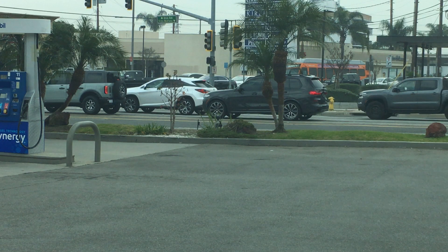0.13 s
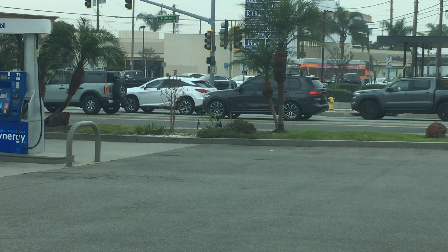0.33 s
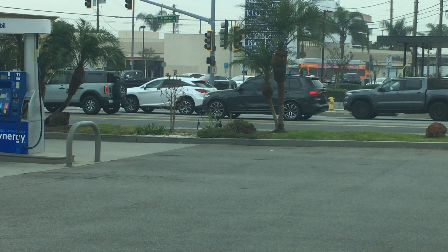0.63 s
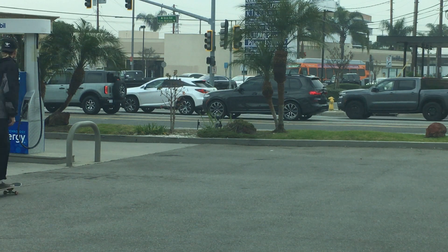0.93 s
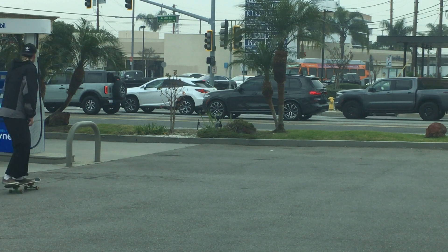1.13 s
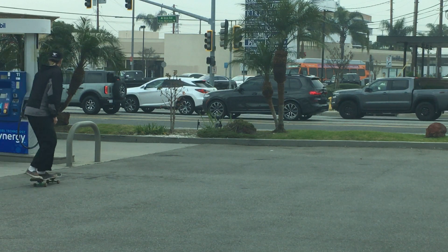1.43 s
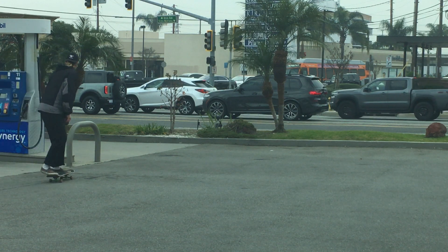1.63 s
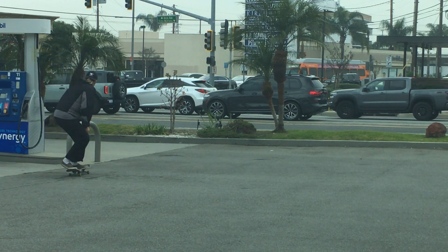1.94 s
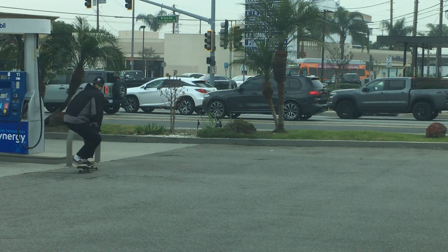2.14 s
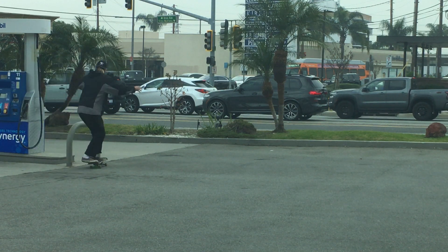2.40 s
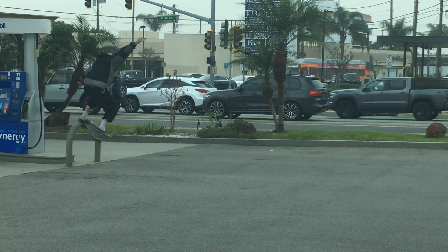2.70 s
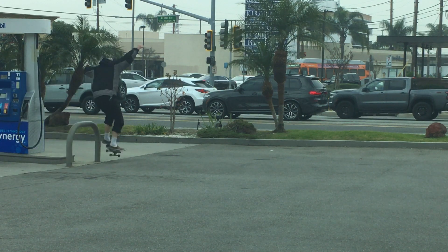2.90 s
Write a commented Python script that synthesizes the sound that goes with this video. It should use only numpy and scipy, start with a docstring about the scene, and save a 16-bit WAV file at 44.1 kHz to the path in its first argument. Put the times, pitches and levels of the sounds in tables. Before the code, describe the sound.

A skateboard clacks faintly twice over pavement joints, then late on pops sharply, knocks a steel bar and scrapes briefly. Deep traffic rumble, engine hum and faint rhythmic brake squeaks continue outdoors, heard from a distance.

```python
"""Deep traffic rumble, shaped noise in overlapping octave bands, fills a forecourt beside a busy road.
An idling engine hums as a sine of drifting pitch, tyres hiss as band-passed noise, and a wheel squeaks
twice a turn as a car pulls away, each rub sweeping through narrow resonances. A skateboard clacks over
joints, pops, knocks on a steel bar (noisy contacts ringing decaying modes) and scrapes as gritty noise;
walls nearby smear each hit into a short noisy tail."""
import sys
import numpy as np
from scipy import signal
from scipy.fft import rfft, irfft
from scipy.io import wavfile
from scipy.ndimage import uniform_filter1d

SR = 44100
rng = np.random.default_rng(int(sys.argv[2]) if len(sys.argv) > 2 else 0)


def bounce(signal):
    """Save signal as a 16-bit WAV file at the path given by the first command-line argument."""
    frames = np.transpose(np.atleast_2d(signal))
    limited = np.clip(frames, -1, 1)
    pcm = np.round(limited * 32767).astype(np.int16)
    wavfile.write(sys.argv[1], SR, pcm)


N = 134946  # samples, about 3.06 s


def undb(db):
    """Decibel law: 20 dB is a factor of ten in amplitude."""
    return 10 ** (np.asarray(db) / 20)


def unit(x):
    """Normalisation to a root-mean-square of 1."""
    return x / np.sqrt(np.mean(x ** 2))


def curve(table, col=1):
    """Linear interpolation: one column of a table, joined by straight lines in time."""
    table = np.array(table, float)
    return np.interp(np.arange(N) / SR, table[:, 0], table[:, col])


def band(x, hz, width_hz):
    """Second-order resonance: gain 1 at its centre."""
    return signal.lfilter(*signal.iirpeak(hz, hz / width_hz, fs=SR), x)


def walk(rate_hz):
    """Smoothed random modulation: levels held for 1 / rate_hz, slewed twice, scaled to an RMS of 1."""
    hold = int(SR / rate_hz)
    steps = np.repeat(rng.standard_normal(N // hold + 1), hold)
    slewed = uniform_filter1d(uniform_filter1d(steps, hold), hold)
    return unit(slewed[:N])


# Spectrum of the traffic noise. Each row: frequency in Hz, relative spectral level in dB.
TRAFFIC_SPECTRUM = [(15, -44), (22, -27), (38, -9.5), (47, -7.5), (55, 2.5), (70, -3), (88, -6.5),
                    (100, -13), (110, -20), (190, -16), (228, -24.5), (280, -21.5), (457, -36.5),
                    (510, -37.5), (580, -33), (750, -41.5), (1130, -39.5), (1340, -44.5), (1600, -44),
                    (2590, -51.5), (4500, -56), (5000, -57), (7400, -61.5), (9300, -59.5), (10400, -63),
                    (11500, -59.5), (16000, -58.5)]
# Slow course of the two lowest octave bands. Each row: time in seconds, level change in dB.
RUMBLE_COURSE = [(0, -5.5), (.4, 1.5), (.8, 2.5), (1.2, 1), (1.6, 0.5), (2.0, -2.5), (2.4, -0.5), (2.7, 0),
                 (3.06, 4)]
TRAFFIC_DB = -43  # RMS level before the modulation
SWELL_DB, FLICKER_DB = 0.6, 0.62  # RMS modulation depths, shared and per band


def traffic():
    """Spectral shaping of noise: octave bands swell together and flicker alone; the lowest follow the rumble."""
    hz = np.maximum(np.arange(N // 2 + 1) * SR / N, 1)
    table = np.array(TRAFFIC_SPECTRUM)
    spectrum_db = np.interp(np.log(hz), np.log(table[:, 0]), table[:, 1])
    noise = rfft(rng.standard_normal(N)) * undb(spectrum_db)
    noise *= undb(TRAFFIC_DB) / np.std(irfft(noise, N))
    octave = np.clip(np.log2(hz / 31.25), 0, 9)
    swell = walk(1.77)
    out = 0
    for k in range(10):
        level_db = SWELL_DB * swell + FLICKER_DB * walk(7.3)
        if k < 2:
            level_db = level_db + curve(RUMBLE_COURSE)
        weight = np.clip(1 - abs(octave - k), 0, 1)  # triangles that overlap and sum to 1
        out = out + undb(level_db) * irfft(noise * weight, N)
    return out


# The engine's low note. Each row: time in seconds, pitch in Hz, RMS level in dB before the waver.
HUM_COURSE = [(0.04, 75.3, -40), (0.05, 78.5, -49.5), (0.6, 80.05, -50.5), (1.1, 80.55, -47.5),
              (1.28, 76.4, -44), (1.45, 80.13, -47.5), (2.12, 80.4, -43.5), (2.42, 78.6, -68),
              (3.06, 78.7, -46)]
HUM_WAVER_DB = -2.5  # scales a random walk of RMS 1


def hum():
    """Phase accumulation: an idling engine's low note is a sine of drifting pitch and wavering level."""
    phase = 2 * np.pi * np.cumsum(curve(HUM_COURSE)) / SR
    level_db = curve(HUM_COURSE, col=2) + HUM_WAVER_DB * walk(6)
    return np.sqrt(2) * undb(level_db) * np.sin(phase)


# The tyres of a passing car. Each row: time in seconds, RMS level in dB before a 1 dB flicker.
TYRE_COURSE = [(0, -81), (1.1, -84), (1.4, -71.5), (1.8, -73.5), (2.2, -82), (2.6, -81.5), (3.06, -74)]
TYRE_HZ, TYRE_WIDTH_HZ = 3170, 1900


def tyres():
    """Band-passed noise: broad tyre hiss swells as a car rolls by."""
    hiss = unit(band(rng.standard_normal(N), TYRE_HZ, TYRE_WIDTH_HZ))
    return undb(curve(TYRE_COURSE) + walk(12.6)) * hiss


# The brake's resonances. Each row: frequency in Hz, width in Hz of each of two filter passes, gain in dB.
BRAKE_MODES = [(5490, 380, -5.5), (5910, 390, -5), (6410, 450, -7), (6910, 310, -9.5)]
# The brake's constant drag. Each row: time in seconds, level in dB before the resonance gain.
DRAG_COURSE = [(0, -85), (1.25, -85), (1.5, -79), (2.0, -79), (2.3, -81), (2.6, -77), (3.06, -79)]
# Squeaks, two to a wheel turn. Each row: time in seconds of the peak at the centre frequency,
# level in dB before the resonance gain, centre frequency in Hz.
SQUEAK_RUBS = [(0.083, -71, 5800), (0.15, -76, 5700), (0.214, -69.5, 5800), (0.297, -78, 6100),
               (0.337, -73.5, 5840), (0.489, -72, 5950), (0.562, -76, 5810), (0.62, -69.5, 5700),
               (0.704, -72.5, 5840), (0.762, -75, 5770), (0.848, -77, 5830), (0.91, -71.5, 5870),
               (0.983, -73.5, 5736), (1.045, -71.5, 5760), (1.128, -74, 5950), (1.212, -73, 5900),
               (1.275, -78, 5840), (1.349, -73, 5790), (1.421, -75, 5910), (1.482, -72, 5810),
               (1.555, -76, 5890), (1.609, -70, 5867), (1.683, -76, 5945), (1.734, -70, 5800),
               (1.801, -71, 5640), (1.853, -70, 5700), (1.916, -77, 5990), (1.97, -73, 5820),
               (2.092, -69, 5972), (2.144, -71, 5900), (2.199, -66, 5740), (2.256, -71, 5970),
               (2.321, -65, 5690), (2.387, -74, 5900), (2.441, -67, 5850), (2.496, -75, 6280),
               (2.55, -64.5, 5570), (2.679, -67.5, 5830), (2.739, -74, 6020), (2.794, -68, 5700),
               (3.004, -73, 6100), (3.049, -73, 5600)]
SQUEAK_S, SQUEAK_WIDTH_HZ = 0.012, 550.0  # standard deviations in time and in frequency
RISE_HZ_PER_S = 40000.0


def squeak():
    """Resonant friction: each rub sweeps upward through the brake's resonances, over a constant drag."""
    t = np.arange(N) / SR
    out = 0
    for hz, width_hz, gain_db in BRAKE_MODES:
        rub = undb(curve(DRAG_COURSE))
        for at, level_db, centre_hz in SQUEAK_RUBS:
            delay = (hz - centre_hz) / RISE_HZ_PER_S  # higher resonances answer later
            near = slice(int((at - 0.07) * SR), int((at + 0.07) * SR))
            in_time = ((t[near] - at - delay) / SQUEAK_S) ** 2
            in_pitch = ((hz - centre_hz) / SQUEAK_WIDTH_HZ) ** 2
            rub[near] += undb(level_db) * np.exp(-0.5 * in_time - 0.5 * in_pitch)
        ring = unit(band(band(rng.standard_normal(N), hz, width_hz), hz, width_hz))
        out = out + undb(gain_db + 1.76 * walk(25.18)) * rub * ring
    return out


# Blows to the deck, then to the steel bar. Each row: start in seconds, level in dB,
# brightness in dB per octave about 1500 Hz, time in seconds for the rattle to fall to 1/e.
DECK_BLOWS = [(.463, -53.5, -7, 0.01), (.616, -53, -6.5, 0.0076), (2.697, -42.5, 2.5, 0.0025),
              (2.704, -47, -2.5, 0.0062), (2.73, -60, 14, 0.014), (2.785, -56.5, 19, 0.011)]
BAR_BLOWS = [(2.858, -45, 3.5, 0.0032), (2.864, -45, -5.5, 0.0076), (2.897, -58, 5, 0.013),
             (2.936, -58.5, 7, 0.0083), (2.95, -59, -7.5, 0.0056), (2.971, -57, -5, 0.0062)]
# Modes of the deck and of the bar. Each row: frequency in Hz, relative level in dB before brightness.
DECK_MODES = [(580, 2), (856, 2), (1195, -5), (1390, -2), (1520, -3), (1680, -2), (1940, -9), (2150, -8),
              (2395, -9), (2585, -8), (2700, -9), (3100, -11), (3690, -15)]
BAR_MODES = [(605, -13), (795, -6.5), (1085, -8), (1430, -7), (1700, 4), (1975, 6.5), (2540, 5.5),
             (3020, 8.5), (3480, 4), (3780, 5), (4300, -7), (5390, -21), (6360, -10), (6880, -13)]
DECK_TOP_HZ, BAR_TOP_HZ = 3830, 7436  # low-pass corners
RING_S = 0.048  # 60 dB decay time at 1 kHz, shorter above
STRIKE_DB = 8  # first sample, relative to the rattle's initial RMS
SMACK_HZ, SMACK_GAIN = 1990, 2 * undb(-3)  # centre at zero brightness


def knocks(hits, modes, top_hz):
    """Modal excitation: a strike and a dying rattle ring the modes and are heard as a broad smack."""
    out = np.zeros(N + SR)
    t = np.arange(SR // 4) / SR
    for at, level_db, tilt_db, rattle_s in hits:
        push = rng.standard_normal(len(t)) * np.exp(-t / rattle_s)
        push[0] = undb(STRIKE_DB)
        body = 0
        for hz, mode_db in modes:
            gain = undb(mode_db + tilt_db * np.log2(hz / 1500)) * (hz / 1000) ** 0.4
            decay = 1000.0 ** (-t * (hz / 1000) ** 0.8 / RING_S)
            body = body + gain * np.sin(2 * np.pi * hz * t) * decay
        ring = signal.fftconvolve(push, body)[:len(t)] / np.linalg.norm(body)
        smack_hz = min(SMACK_HZ * 2 ** (tilt_db / 4), 6000)  # brighter blows smack higher
        smack = band(band(push, smack_hz, 1.6 * smack_hz), smack_hz, 1.6 * smack_hz)
        out[int(at * SR):][:len(t)] += undb(level_db) * (ring + SMACK_GAIN * smack)
    return signal.sosfilt(signal.butter(6, top_hz, fs=SR, output="sos"), out[:N])


TAIL_DB, TAIL_T60_S, TAIL_HZ = -9.5, 0.55, 3460  # level, 60 dB decay time, low-pass corner


def walls(x):
    """Diffuse reverberation: convolution with decaying, dulled noise smears each hit."""
    t = np.arange(SR // 2) / SR
    onset = 1 - np.exp(-t / 0.002)
    echo = rng.standard_normal(len(t)) * 1000.0 ** (-t / TAIL_T60_S) * onset
    echo = signal.lfilter(*signal.butter(1, TAIL_HZ, fs=SR), echo)
    return undb(TAIL_DB) * signal.fftconvolve(x, echo / np.linalg.norm(echo))[:N]


# The board scraping along the bar. Each row: time in seconds, level in dB.
SCRAPE_COURSE = [(2.86, -90), (2.88, -69), (2.92, -70), (2.95, -62), (3.0, -72), (3.06, -82)]
SCRAPE_HZ, SCRAPE_WIDTH_HZ = 2414, 2400  # the second filter pass is twice as wide
GRIT_DB = 4.0  # RMS depth of the rapid level changes


def scrape():
    """Sliding friction: band-passed noise made gritty by rapid random level changes."""
    grit = rng.standard_normal(N) * undb(GRIT_DB * walk(150))
    narrow = band(grit, SCRAPE_HZ, SCRAPE_WIDTH_HZ)
    rasp = unit(band(narrow, SCRAPE_HZ, 2 * SCRAPE_WIDTH_HZ))
    gate = np.arange(N) > SCRAPE_COURSE[0][0] * SR  # silent before the first row
    return gate * undb(curve(SCRAPE_COURSE)) * rasp


def scene():
    """Superposition: all sources add, and only the board's hits excite the walls."""
    board = knocks(DECK_BLOWS, DECK_MODES, DECK_TOP_HZ) + knocks(BAR_BLOWS, BAR_MODES, BAR_TOP_HZ)
    street = traffic() + hum() + tyres() + squeak()
    return (street + board + walls(board) + scrape())[None]


START_S = 0.034  # the microphone opens here
TOP_HZ = 15800  # low-pass corner


def record(dry):
    """Gating and low-pass filtering: opens after a short silence and cuts the top."""
    opened = dry * np.clip((np.arange(N) / SR - START_S) / 0.0008, 0, 1)  # 0.8 ms fade in
    return signal.sosfilt(signal.ellip(10, 0.2, 60, TOP_HZ, fs=SR, output="sos"), opened)


dry = scene()
out = record(dry)
bounce(out)
```